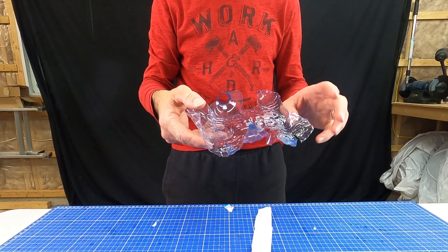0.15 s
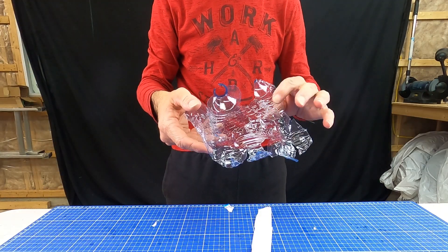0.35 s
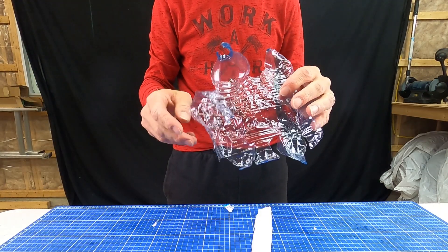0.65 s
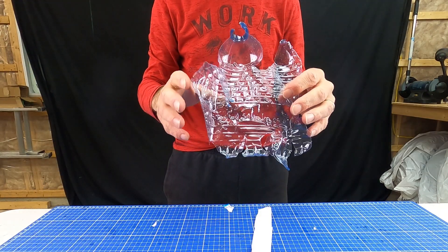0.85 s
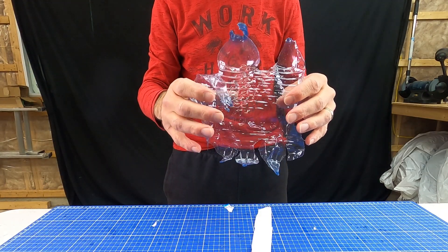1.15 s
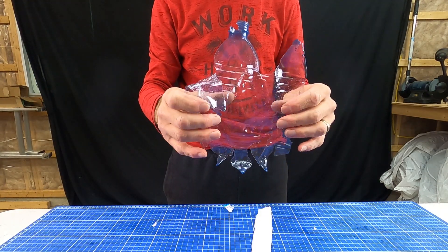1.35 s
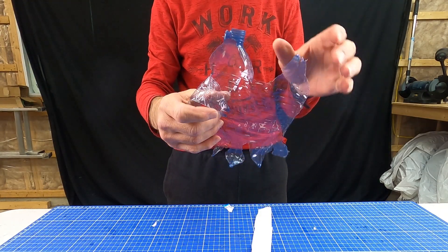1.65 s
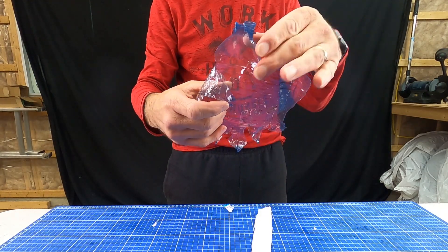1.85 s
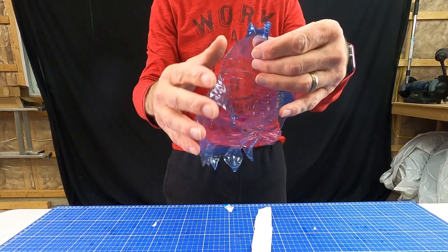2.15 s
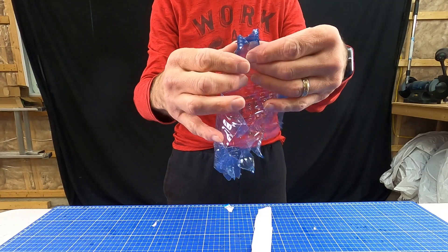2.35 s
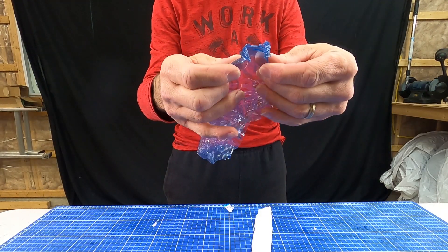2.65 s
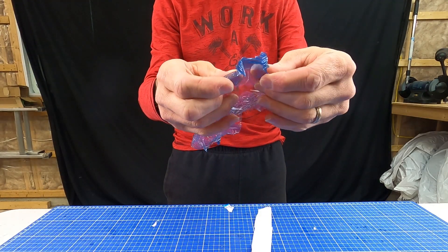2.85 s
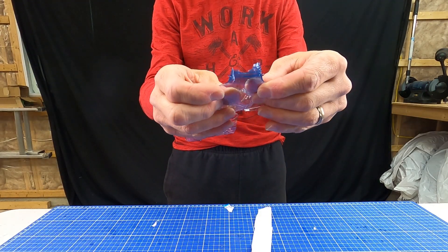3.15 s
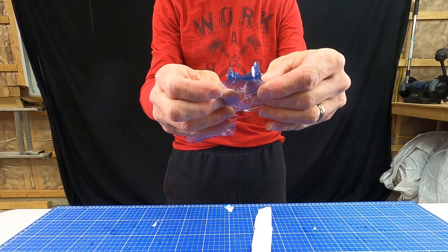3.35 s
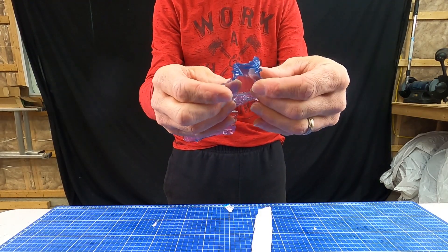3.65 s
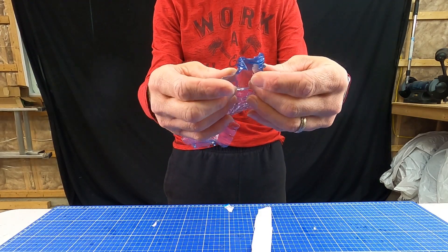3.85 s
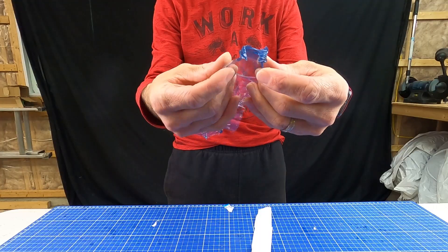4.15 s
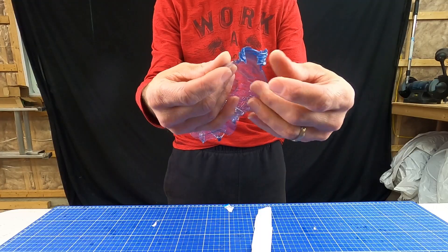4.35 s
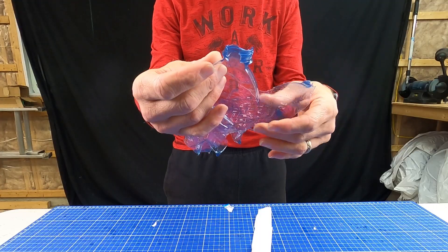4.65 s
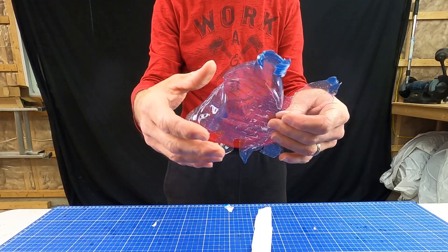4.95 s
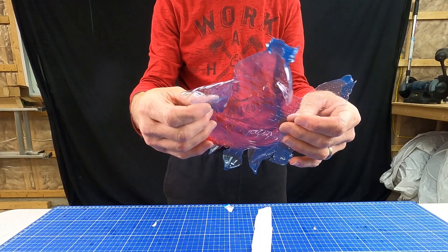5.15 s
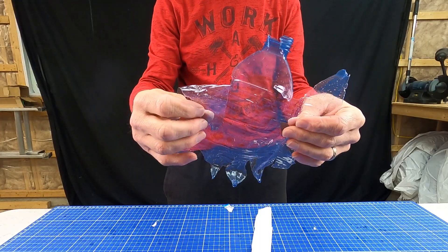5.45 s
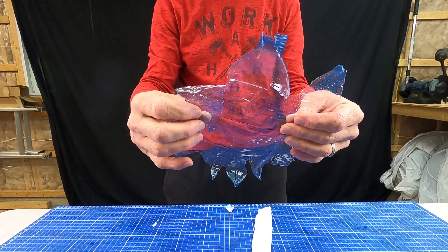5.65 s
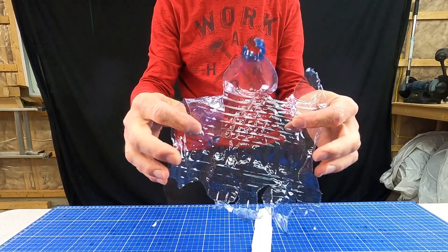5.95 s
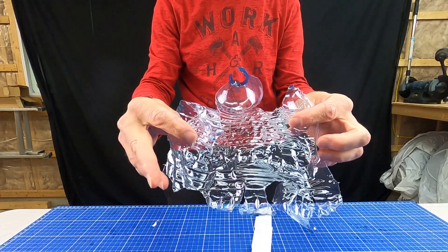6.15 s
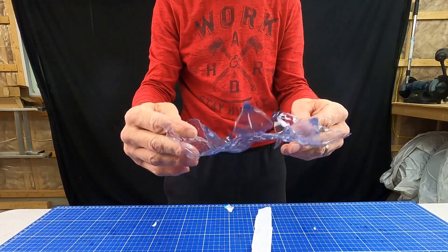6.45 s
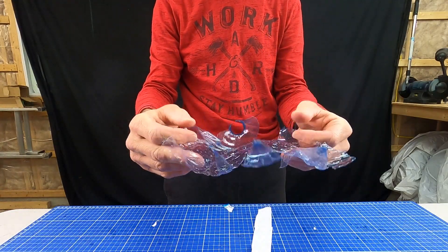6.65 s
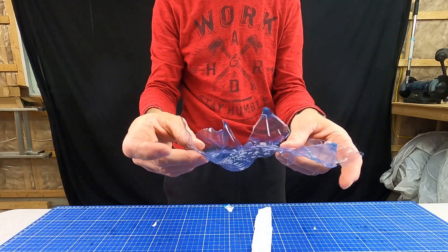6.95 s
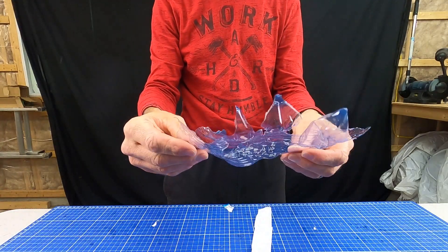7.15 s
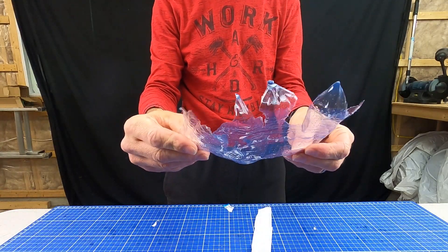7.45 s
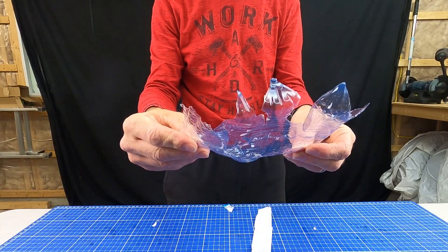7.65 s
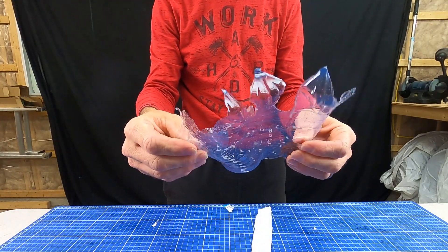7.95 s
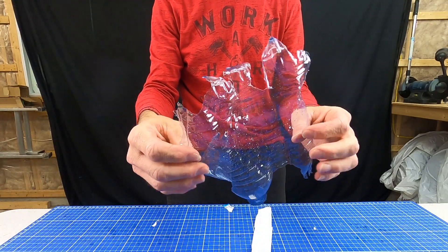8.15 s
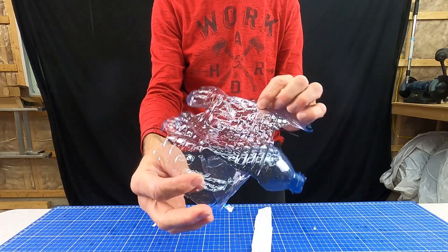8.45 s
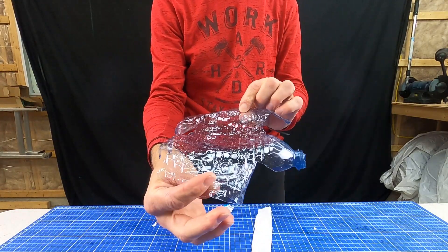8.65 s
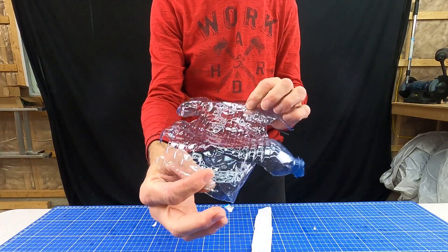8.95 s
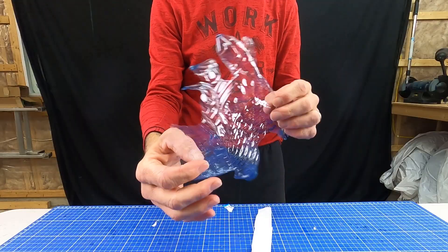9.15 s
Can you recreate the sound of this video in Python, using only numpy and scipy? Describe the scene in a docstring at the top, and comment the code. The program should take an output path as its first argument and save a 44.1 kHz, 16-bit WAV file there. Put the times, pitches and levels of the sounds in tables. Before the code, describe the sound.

Crisp, bright crackling and popping of thin stiff plastic being squeezed and turned by hand, in clumps with brief lulls, close in a small room.

```python
"""A quiet workshop, where two hands turn and squeeze a torn-open thin plastic bottle.
Creases buckle with short snaps: bursts of ragged noise, each ringing its own patch of sheet.
Finer crackle, made of tiny random clicks, fills in between; the loose flaps wobble as low tones.
The room answers snaps and crackle with a short tail of fading noise, over faint steady air."""
import sys
import numpy as np
from scipy import signal
from scipy.fft import rfft, irfft, next_fast_len
from scipy.io import wavfile
from scipy.ndimage import uniform_filter1d, map_coordinates

SR = 44100
rng = np.random.default_rng(int(sys.argv[2]) if len(sys.argv) > 2 else 0)


def to_wav(s):
    """Save 16-bit WAV."""
    ch = np.atleast_2d(s).T  # columns
    pcm = np.round(np.clip(ch, -1, 1) * 32767)  # PCM
    wavfile.write(sys.argv[1], SR, pcm.astype(np.int16))


N = 410571

# Creases that buckle, plus one knock of a hand at 4.544 s, sounded the same way. Each row: start in seconds,
# level of the ringing sheet in dB, pitch of the patch in Hz, slip length in ms, then crack and thump in dB
# against the ringing, before their common boosts.
CREASES = [(0.064, -38.5, 2200, 17, -14.5, -4.5), (0.091, -40, 3360, 2.6, -14, -13),
           (0.1792, -42, 2080, 1.4, -17, -13), (0.518, -47, 2260, 3.9, -22, -7),
           (0.541, -35.5, 2850, 1, -10, -18), (0.5808, -38, 2880, 6.3, -13, -14),
           (0.6054, -28.5, 2460, 3, -16, -27), (0.6189, -23, 2400, 1.1, -20.5, -19),
           (0.8008, -48.5, 2000, 6.3, -16, -16), (0.9939, -37, 2060, 1.35, -11, -24),
           (1.1305, -39.5, 2420, 2.3, -15, -14), (1.1928, -44, 1790, 2.2, -19, -3),
           (1.1961, -35.5, 1690, 8.8, -14, 1.5), (1.28, -18, 2410, 0.69, -3.5, -35),
           (1.3107, -39, 1560, 1.2, -26, -12.5), (1.418, -29.5, 2360, 1.5, -16, -26),
           (1.5169, -34.5, 1800, 11, -14, -10), (1.538, -9, 3410, 0.41, -12.5, -22.5),
           (1.554, -13, 4340, 2, -5.5, -27), (1.6196, -20.5, 2860, 1.1, -15.5, -6.5),
           (1.6239, -10.5, 3060, 5.3, -17, -18), (1.651, -14.5, 1590, 5.5, -17, -13),
           (1.6575, -14.5, 2700, 2.8, -5, -8.5), (1.967, -48.5, 2880, 2.9, -28, -6),
           (2.023, -47.5, 990, 2, -1, 5.5), (2.0366, -36, 3800, 1.3, -12, -40),
           (2.0985, -33, 2540, 12, -17, -12), (2.1208, -24.5, 2220, 20, -11, -12.5),
           (2.1462, -15, 2180, 2.1, -27, -18), (2.1544, -19.5, 1900, 4, -5.5, -29),
           (2.1709, -22.5, 2270, 9.1, -14.5, -13.5), (2.221, -32.5, 1400, 8.3, -15, -3),
           (2.276, -30.5, 2560, 2, -16, -25), (2.293, -29, 2120, 2.2, -9, -10),
           (2.3022, -24, 1650, 1.34, -8.5, -12), (2.329, -20.5, 1470, 3.7, -14, -20),
           (2.4079, -18.5, 3300, 1.4, -20, -28), (2.4114, -20, 3200, 3, -11, -23),
           (2.4485, -18, 2770, 1.9, -2.5, -25), (2.458, -15, 4580, 3.4, -7, -24),
           (2.4669, -7, 2700, 2, -6, -18.5), (2.5434, -19.5, 2810, 0.57, -9, -43),
           (2.6187, -31, 2470, 2.1, -11, -12), (2.7707, -34, 3430, 13, -7, -11),
           (2.7831, -21, 1880, 2.5, -12, -10.5), (2.795, -8.5, 2040, 6.8, -16.5, -16.5),
           (2.8893, -10.5, 3030, 2, -5, -26), (2.9128, 1, 3800, 1.55, -14.5, -42),
           (2.9924, -18.5, 1590, 2.3, -19, -18), (3.057, -25, 1940, 3.9, -15, -21),
           (3.0811, -3, 2400, 0.16, -20, -38), (3.2817, -23.5, 2690, 0.63, 1.5, -15),
           (3.2849, -17.5, 2120, 1.6, -20, -33), (3.3144, -26.5, 3630, 1.25, -3, -34),
           (3.366, -30.5, 2780, 3.2, -10.5, -23.5), (3.6079, -33.5, 1700, 11.7, -13, -24.5),
           (3.7309, -36.5, 3450, 2.9, -14, -19), (3.7427, -33, 1670, 1.2, -6, -14),
           (3.7837, -6.5, 2060, 1.8, 3, -47), (3.908, -23, 1110, 1.96, -16, -36),
           (4.03, -15.5, 3280, 1.4, -13, -30), (4.1249, -20, 2860, 3.4, -18, -33),
           (4.2785, -25.5, 2220, 1.8, -1.5, -43), (4.296, -27.5, 3300, 0.71, 1, -40),
           (4.305, -24, 2840, 1.2, 0, -26), (4.312, -22.5, 3180, 2.4, -11, -35),
           (4.3284, -4.5, 2480, 1.74, -4.5, -14), (4.334, -4, 2780, 2, -6, -20),
           (4.4215, 7, 2830, 0.69, -5, -26.5), (4.544, -47.5, 1000, 4.6, -28, 0.5),
           (4.6826, -30.5, 2017, 2.2, -24, -21), (4.8357, -34.5, 1460, 1.1, -12, -14),
           (4.8532, -29.5, 1520, 2.3, -14.5, -8.5), (4.881, -30, 1050, 1.1, -27, -15),
           (4.8951, -25, 3270, 2.3, -22, -20), (4.96, -17.5, 2650, 3.6, -11, -28),
           (4.9927, -25, 3080, 8.6, -4, -20), (5.005, -1.5, 3100, 1.23, -2, -24.5),
           (5.207, -21.5, 2760, 8.9, -17.5, -21.5), (5.2219, -23, 1143, 5.6, -13, -11.5),
           (5.225, -25, 1700, 3.8, -11, -37), (5.275, -21, 2200, 3.2, -13, -8.5),
           (5.2944, -14, 3080, 2.8, -7, -10), (5.298, -7, 2600, 3.3, -24, -18),
           (5.323, -16.5, 3670, 0.51, 0.5, -35), (5.3825, -19.5, 1240, 1.3, -21, -23),
           (5.4655, -9, 3160, 1.1, -6, -28), (5.533, -14, 3570, 1.7, -8.5, -45),
           (5.601, -22.5, 3100, 0.44, -31, -31), (5.71, -26.5, 1480, 1.7, -2, -30),
           (5.7225, -28, 3030, 1.3, -5.5, -18.5), (5.886, -31.5, 3030, 1.5, -12, -11),
           (5.894, -30, 1060, 1.6, -24, -15), (5.9288, -8, 2200, 0.4, -19, -38),
           (5.9317, -11.5, 2880, 2.8, -11, -17), (5.95, -14, 1290, 3.3, -24, -11),
           (5.9555, -11, 3150, 0.66, -6, -25), (5.959, -4.5, 3430, 2, -3, -22),
           (5.9971, -2.5, 3190, 1.6, -9.5, -28), (6.0188, -12.5, 3550, 3, -10, -21),
           (6.0345, -23.5, 1650, 33, -12, -6), (6.0781, -19, 890, 7.4, -10.5, -7.5),
           (6.1191, -24.5, 2406, 2.9, -9, -28), (6.138, -16.5, 1720, 2.8, -36, -20),
           (6.168, -10.5, 2930, 4.2, -10.5, -19.5), (6.174, -26.5, 2880, 1.1, -19, -7),
           (6.335, -38, 2370, 3.3, -19.5, -11), (6.458, -40, 2530, 1.2, -22, -16),
           (6.5335, -34, 2990, 0.6, -10, -17.5), (6.5832, -32, 2760, 23, -11.5, -16.5),
           (6.6944, -15.5, 2510, 7, -7.5, -24), (6.8161, -30.5, 2220, 4.4, -10, -13.5),
           (6.8573, -24, 3200, 2.3, -8.5, -16.5), (6.9652, -21, 2780, 38, -6, -12),
           (6.986, -6, 2900, 7.2, -16, -17), (6.9962, -6, 2790, 1.7, -24, -11),
           (7.056, -28, 2330, 5.9, -10.5, -7.5), (7.0872, -21.5, 2980, 2, -25, -37),
           (7.1033, -15.5, 2330, 1.57, -10, -21.5), (7.18, -26.5, 1250, 0.93, -16, -21),
           (7.2635, -29, 1060, 3.1, -14, -34), (7.289, -20.5, 1900, 1.5, -14.5, -38),
           (7.295, -10.5, 2990, 1.5, -16.5, -53), (7.335, -22.5, 1220, 2.7, -28, -5.5),
           (7.3607, -14.5, 1510, 4.6, -19, -17), (7.366, -10.5, 2400, 1.6, -4, -39),
           (7.3743, -7.5, 3110, 1.4, -14, -15.5), (7.419, -7, 1500, 3.3, -16, -13.5),
           (7.444, -15, 1390, 1.5, -5, -22), (7.4483, -4.5, 2960, 1.66, -9.5, -20),
           (7.456, -14, 2830, 3.3, -1, -19), (7.4714, -2.5, 3290, 1.1, -17, -18.5),
           (7.4903, -6, 2720, 3.9, -16, -18), (7.5053, -14.5, 4180, 1.8, 4, -51),
           (7.5337, -24.5, 2910, 3.6, -7.5, -38), (7.6086, -3.5, 964, 1.3, -51.5, -22),
           (7.945, -39.5, 1080, 3.7, -26, -14), (7.9725, -11.5, 3700, 1.86, -11, -18.5),
           (8.053, -11.5, 1514, 2, -21, -30), (8.1018, -7, 1720, 5, -20, -20),
           (8.1068, -2, 2630, 0.87, -7, -19), (8.2487, -28, 1750, 0.38, -32, -22),
           (8.3845, -8.5, 2700, 1.27, -8.5, -52), (8.394, -7.5, 2520, 0.99, -18, -21),
           (8.404, -1.5, 2460, 1.3, -19, -22), (8.4686, -11, 1950, 0.36, -31, -20),
           (8.6306, -11.5, 1770, 1.3, -11, -21), (8.6414, -37, 1440, 1.5, -20, -21.5),
           (8.9008, -18, 1975, 1.9, -13, -26), (9.06, -37.5, 3550, 2, -9.5, -13),
           (9.076, -37, 2910, 10.6, -2.5, -8.5), (9.101, -25.5, 2420, 5.1, -17, -12.5),
           (9.115, -34.5, 2500, 2, -1, -15), (9.146, -19.5, 2720, 1.6, 4.5, -30),
           (9.217, -37.5, 1860, 1.9, -10, -12.5)]


def from_db(db):
    """Turns decibels into a plain factor for loudness."""
    return 10 ** (np.asarray(db) / 20)


def rms_one(x):
    """Scales a signal to an average strength (root mean square) of 1."""
    return x / np.sqrt(np.mean(x ** 2) + 1e-20)


def peak_one(rows):
    """Scales each row so that its highest peak is 1."""
    return rows / np.abs(rows).max(axis=-1, keepdims=True)


def at_hz(points, hz, column=1):
    """Reads a table column at any frequency, in straight lines over log frequency."""
    points = np.array(points)
    return np.interp(np.log(hz), np.log(points[:, 0]), points[:, column])


def band(x, low_hz, high_hz):
    """Keeps the frequencies between two edges."""
    edges_hz = [low_hz, min(high_hz, 0.45 * SR)]
    return signal.sosfilt(signal.butter(2, edges_hz, "band", fs=SR, output="sos"), x)


def colour(x, spectrum):
    """Makes each frequency louder or softer, as the spectrum says in dB."""
    size = next_fast_len(N)
    hz = np.maximum(np.arange(size // 2 + 1) * SR / size, 1)
    coloured = rfft(x, size) * from_db(at_hz(spectrum, hz))
    return irfft(coloured, size)[..., :N]


def smooth(x, time_s):
    """Follows a signal sluggishly, closing most of any gap within the given time."""
    keep = np.exp(-1 / (time_s * SR))
    return signal.lfilter([1 - keep], [1, -keep], x)


def drift(rate_hz):
    """Wanders slowly at random around 0 with a spread of 1: noise smoothed twice over."""
    step = 40   # computed on every 40th sample only
    keep = np.exp(-2 * np.pi * rate_hz * step / SR)
    noise = rng.standard_normal(N // step + 2002)
    slow = signal.lfilter([1], [1, -2 * keep, keep ** 2], noise)[2000:]   # skip the settling in
    return np.interp(np.arange(N) / step, np.arange(len(slow)), rms_one(slow))


def air(level_db=-71, side_db=-8.5):
    """Still air of the workshop: steady coloured noise, partly different left and right."""
    # Colour of the air. Each row: frequency in Hz, strength in dB per Hz.
    air_colour = [(18, -26), (30, -6.5), (115, -5), (194, -13), (937, -21.5), (1250, -24), (4300, -38.5),
                  (7470, -37.5), (10800, -53), (16000, -44)]
    mid, side = rng.standard_normal((2, N))
    stereo = mid + from_db(side_db) * side * [[1], [-1]]
    return from_db(level_db) * rms_one(colour(stereo, air_colour))


def snaps(size=2600):
    """A crease slips raggedly: its patch rings, the sheet around rattles, crack on top, thump below."""
    cycles, ring_on, hollow_db = 3.06, 0.17, -28   # cycles of a plain patch per 60 dB of fading
    rise_s, ragged_db, thump_t60_s = 0.000079, 4.0, 0.074
    body_db, crack_boost_db, thump_boost_db, scatter_db = -8, 3.0, 4.0, 0.6
    start_s, peak_db, hz, slip_ms, crack_db, thump_db = np.transpose(CREASES)[:, :, None]
    t = np.arange(size) / SR
    noise = rng.standard_normal((len(start_s), 4, size))

    # the slip starts sharply, sticks and slips, and dies away
    ragged = from_db(ragged_db * rms_one(uniform_filter1d(noise[:, 3], size=30)))
    fade = np.exp(-0.5 * (1000 * t / np.maximum(slip_ms, 0.2)) ** 2)
    course = (1 - np.exp(-t / rise_s)) * fade * ragged
    slip = noise[:, 0] * course

    # a dull pop comes from a domed patch, which rings longer and rattles less
    hollow = np.maximum(from_db(hollow_db - crack_db), 1)
    ring_fade = from_db(-60 * t * hz / cycles / hollow ** ring_on)
    ring = np.sin(2 * np.pi * hz * t) * ring_fade * (1 - np.exp(-t * hz))
    patch = peak_one(band(signal.fftconvolve(slip, ring, axes=1)[:, :size], 550, 7170))
    body = peak_one(band(band(slip, 520, 4980), 690, 3300)) / hollow
    crack = peak_one(band(noise[:, 1] * course, 2470, 12150))
    thump_course = course + from_db(-60 * t / thump_t60_s)
    thump = peak_one(band(noise[:, 2] * thump_course, 118, 648))

    shapes = peak_one(patch + from_db(body_db) * body)
    shapes = shapes + from_db(crack_db + crack_boost_db) * crack
    shapes = shapes + from_db(thump_db + thump_boost_db) * thump
    pans_db = scatter_db * noise[:, 3, 0]   # creases lie a little left or right
    starts = (start_s[:, 0] * SR).astype(int)
    out = np.zeros((2, N + size))
    for start, shape, level_db, pan_db in zip(starts, shapes, peak_db, pans_db):
        sides_db = pan_db * np.array([[0.5], [-0.5]])
        out[:, start:start + size] += shape * from_db(level_db + sides_db)
    return out[:, :N]


def aftermath(start_db=-52.5, rise_s=0.012, fade_db_per_s=136.5):
    """Loudness of the sheet settling after each snap: crackle swells briefly, then fades."""
    start_s, peak_db = np.transpose(CREASES)[:2]
    kicks = np.full(N, 1e-18)
    np.add.at(kicks, (start_s * SR).astype(int), from_db(peak_db + start_db))
    fading = signal.lfilter([1], [1, -from_db(-fade_db_per_s / SR)], kicks)
    return smooth(fading, rise_s)


def crackle(per_s=900, spread_db=6.0, clump_db=6.5, rub_db=-12):
    """Tiny random buckles in clumps, each ringing a patch a few cycles, over skin rubbing on plastic."""
    # Grip of the hands, as the fine crackle it keeps going. Each row: time in seconds, level in dB.
    grip = [(0.0, -109), (0.7, -78), (1.09, -99), (1.35, -65), (1.84, -100), (2.28, -45), (2.7, -63.5),
            (3.42, -100), (3.9, -49.5), (4.7, -72.5), (5.16, -47.5), (5.75, -81), (6.07, -41.5),
            (6.42, -80), (6.6, -48.5), (7.45, -57), (7.8, -74), (9.31, -64)]
    # Colour of the crackle. Each row: frequency in Hz, strength in dB per Hz.
    sheet_colour = [(120, -42.5), (200, 0.5), (361, -1.5), (638, -8.5), (994, 4), (1460, -6.5), (2890, 4),
                    (5830, -9.5), (7680, -20), (12400, -34.5), (15200, -33.5), (16400, -47)]
    sizes = from_db(spread_db * np.minimum(rng.exponential(1, N), 4)) * rng.choice([-1, 1], N)
    chance = per_s * from_db(clump_db * drift(15)) / SR
    clicks = sizes * (rng.random(N) < chance)

    # each click is dealt at random to one of eight pitch bands
    edges_hz = np.geomspace(200, 19000, 9)
    dealt = rng.integers(0, 8, N)
    grains = np.zeros(N)
    for k in range(8):
        grains += band(clicks * (dealt == k) + 1e-18, edges_hz[k], edges_hz[k + 1])
    grains = rms_one(grains) + from_db(rub_db) * rng.standard_normal(N)

    grip_s, grip_db = np.transpose(grip)
    loudness = from_db(np.interp(np.arange(N) / SR, grip_s, grip_db)) + aftermath()
    return loudness * rms_one(colour(grains, sheet_colour))


def workshop(x, first_s=0.00095, early_db=12.5, early_t60_s=0.047, move_s=0.13, count=4, size=32000):
    """Reflections as noise dying band by band: a quick early part from bench and hands, then the room.
    The bottle keeps moving, so the sound passes from one pattern of reflections to the next."""
    # Tail of the room. Each row: frequency in Hz, time to fade by 60 dB in seconds, level in dB,
    # left-right difference (side) in dB against the shared part (mid).
    room = [(149, 0.26, -11, -14.5), (410, 0.2, -8, -15.5), (1060, 0.32, -10, -13.5), (2700, 0.45, -14, -9),
            (7060, 0.48, -13, -6), (14000, 0.4, -26.5, 7.5)]
    t = np.arange(size) / SR
    white = rng.standard_normal((2, 2, count, 1, size))
    patterns = 0
    edges_hz = 70 * 2 ** np.arange(0, 8.1, 0.5)   # half-octave bands
    for k, (low_hz, high_hz) in enumerate(zip(edges_hz, edges_hz[1:])):
        hz = np.sqrt(low_hz * high_hz)
        t60_s, level_db, side_db = (at_hz(room, hz, column) for column in (1, 2, 3))
        mid, side = band(white[k % 2], low_hz, high_hz)   # neighbouring bands use different noise
        decay = from_db(-60 * t / t60_s) + from_db(early_db - 60 * t / early_t60_s)
        energy = np.sqrt(t60_s * SR / np.log(1000) / 2)   # level is that of the whole late tail
        stereo = mid + from_db(side_db) * side * [[1], [-1]]
        patterns = patterns + from_db(level_db) * decay / energy * stereo
    patterns = patterns * np.clip(t / first_s - 1, 0, 1)   # silent until the first reflection

    place = np.arange(N) / SR / move_s
    wet = np.zeros((2, N))
    for k, pattern in enumerate(patterns):
        distance = np.abs((place - k + 1) % count - 1)
        share = np.sqrt(np.maximum(1 - distance, 0))
        wet += signal.oaconvolve(share * x[None], pattern, axes=1)[:, :N]
    return wet


def wobble(waver=0.03, octave_db=-9, rumble_db=-12):
    """A wavering low tone with its octave and some rumble; the flap swinging widest is the one heard."""
    # Loose flaps set wobbling. Each row: time of the peak in seconds, pitch at the peak in Hz,
    # level in dB, rise in seconds, fade in seconds.
    flaps = [(1.15, 49.7, -58.5, .5, 0.49), (1.38, 61.2, -55.5, 0.26, 0.3), (1.62, 72.3, -54, 0.51, 1),
             (1.7, 98.7, -48, 0.1, 0.17), (2.31, 74.4, -52.5, 0.12, 0.11), (2.48, 70.4, -53, .08, 0.23),
             (3.55, 74.25, -59, 0.22, 0.71), (4.43, 80.74, -51.5, .2, 0.081), (4.87, 67.4, -50, .12, 0.48),
             (5.05, 68.45, -43, 0.16, 0.11), (5.31, 79.1, -32, 0.11, 0.13),
             (5.96, 70.3, -46.5, 0.061, 0.28), (6.22, 70.06, -39.5, 0.29, 0.18),
             (6.74, 64, -64, 0.61, 0.19), (7.0, 70.4, -42.5, 0.11, .14), (7.39, 72.75, -44.5, .16, 0.26),
             (8.11, 69.7, -50.5, .17, 0.27), (8.43, 82, -51, 0.22, 0.11)]
    swing_range_db, stiffen_hz_per_s = 30.5, 30   # change over each rise or fade; climb of the pitch
    rest_hz, rest_db = 48.1, -78.5                # flaps at rest
    t = np.arange(N) / SR
    hz, level_db = np.full(N, rest_hz), np.full(N, rest_db)
    for peak_s, peak_hz, peak_db, rise_s, fade_s in flaps:
        away = np.maximum((peak_s - t) / rise_s, (t - peak_s) / fade_s)
        swing_db = peak_db - swing_range_db * away
        hz = np.where(swing_db > level_db, peak_hz + stiffen_hz_per_s * (t - peak_s), hz)
        level_db = np.maximum(swing_db, level_db)
    turn = 2 * np.pi * np.cumsum(hz * (1 + waver * drift(9.9))) / SR
    tone = np.sin(turn) + from_db(octave_db) * np.sin(2 * turn + 1)
    rumble = rms_one(band(rng.standard_normal(N), 22, 120))
    return from_db(level_db) * rms_one(tone + from_db(rumble_db) * rumble)


def later(x, start_us=3.4, end_us=31.8):
    """Reads the sound a growing lag behind, in microseconds."""
    lag = np.linspace(start_us, end_us, N) * SR / 1e6
    return map_coordinates(x, [np.arange(N) - lag], order=3, mode="nearest")


def gain_control(x, knee_db=-26, share=0.54, release_db_per_s=150, attack_s=0.0032, window_s=0.0012):
    """A loud snap slips through, then the gain ducks and climbs back, flattening the start of the tail."""
    power = uniform_filter1d(np.mean(x ** 2, axis=0), round(window_s * SR))
    loudness_db = 10 * np.log10(np.abs(power) + 1e-12)
    duck_db = share * np.maximum(loudness_db - knee_db, 0)
    ramp_db = release_db_per_s * np.arange(N) / SR
    held_db = np.maximum.accumulate(duck_db + ramp_db) - ramp_db   # holds peaks, lets go steadily
    return x * from_db(-smooth(held_db, attack_s))


def scene():
    """Adds the bottle, the room's answer to it, the flaps and the air."""
    sheet = snaps() + crackle()
    return sheet + workshop(sheet.mean(axis=0)) + wobble() + air()


def record(dry):
    """The left port hears ever later as the bottle drifts right, and a little duller; then microphone
    colour, gain control, rounded peaks and a cut at the top."""
    # Colour of the microphone. Each row: frequency in Hz, gain in dB.
    microphone = [(300, -1.5), (640, -8.5), (900, -2.5), (5800, 3), (7700, 6), (9500, -5), (16000, -16.5)]
    ceiling, drive, cutoff_hz = 0.86, 1.14, 16500
    left = signal.lfilter([0.75, 0.25], [1], later(dry[0])) * from_db(0.26)
    ports = gain_control(colour(np.array([left, dry[1]]), microphone))
    rounded = ceiling * np.tanh(drive * ports / ceiling)
    return signal.sosfilt(signal.cheby2(12, 70, cutoff_hz, fs=SR, output="sos"), rounded)


dry = scene()
out = record(dry)
to_wav(out)
```